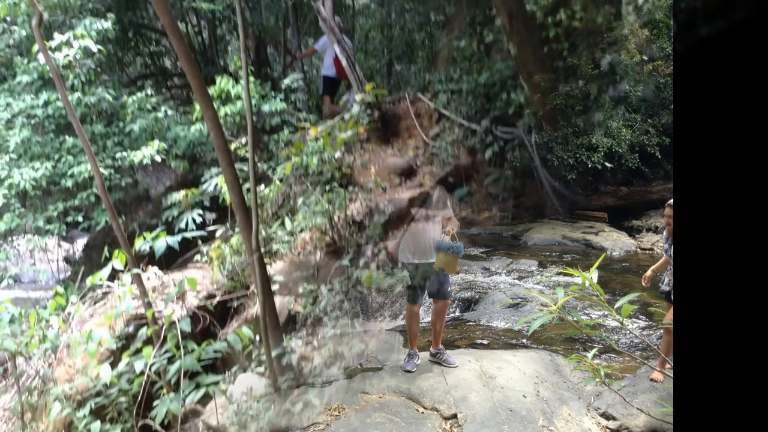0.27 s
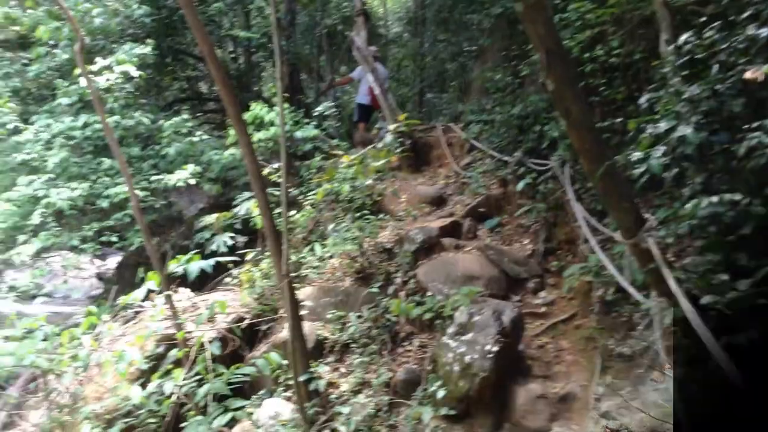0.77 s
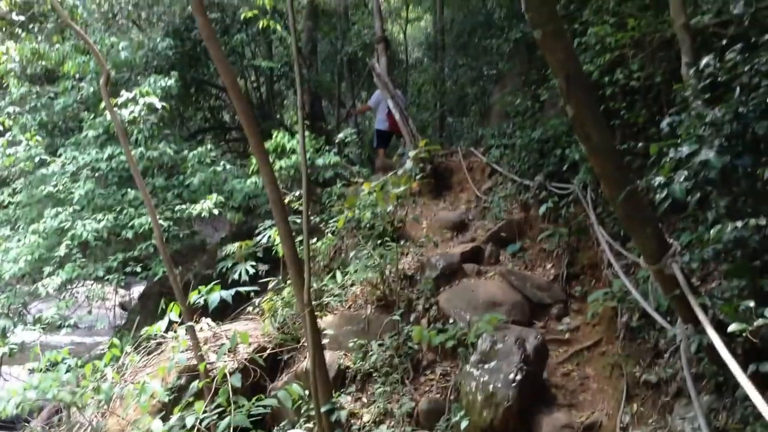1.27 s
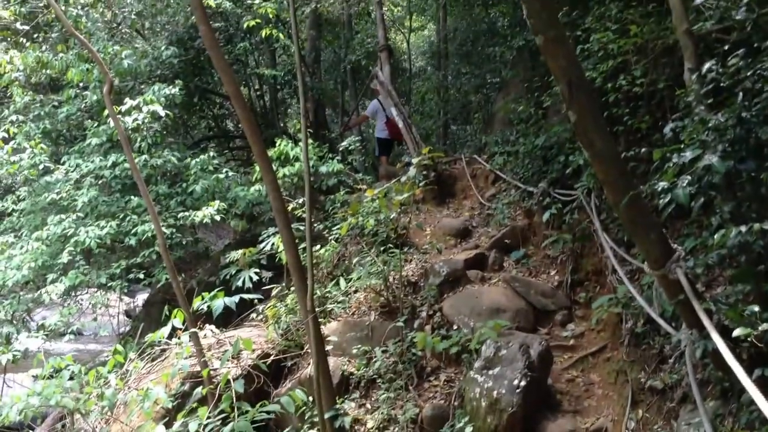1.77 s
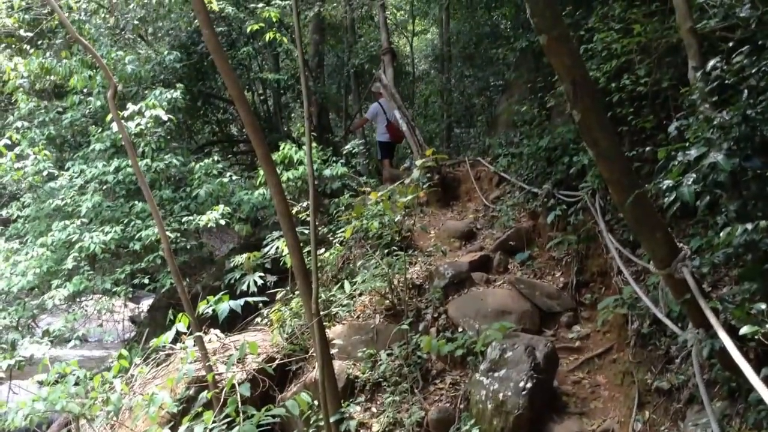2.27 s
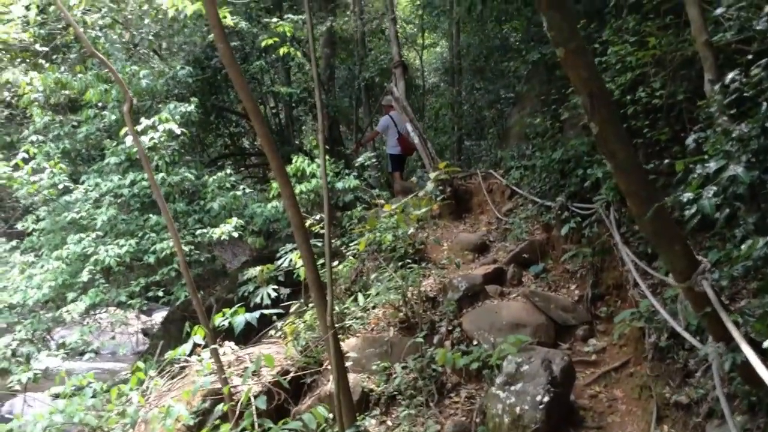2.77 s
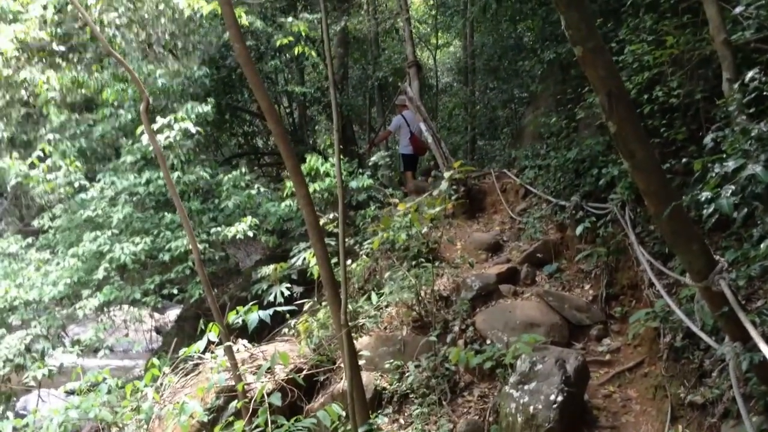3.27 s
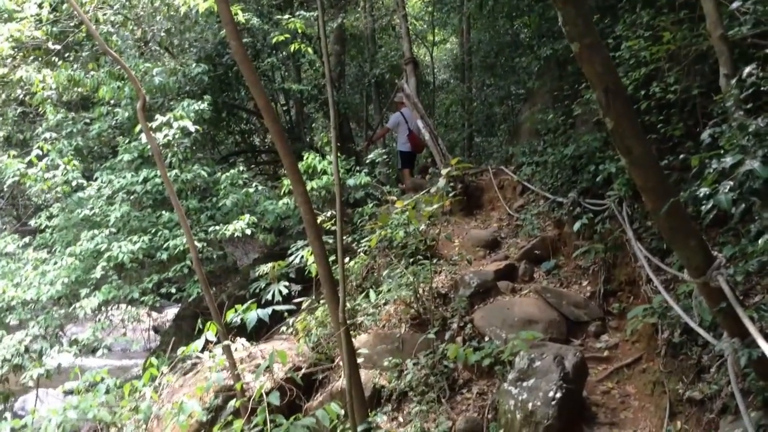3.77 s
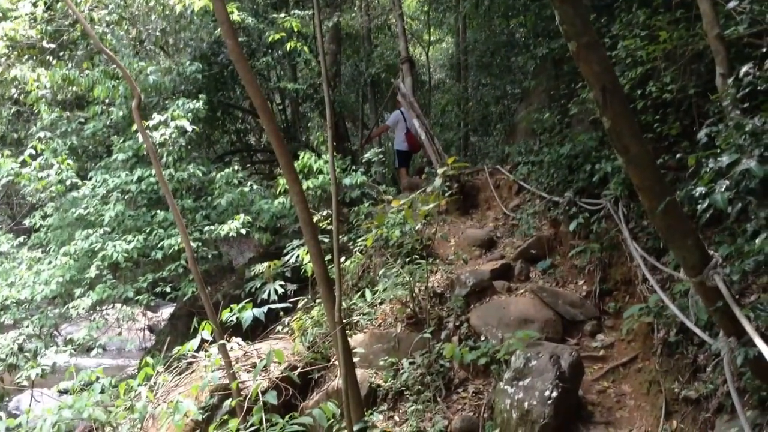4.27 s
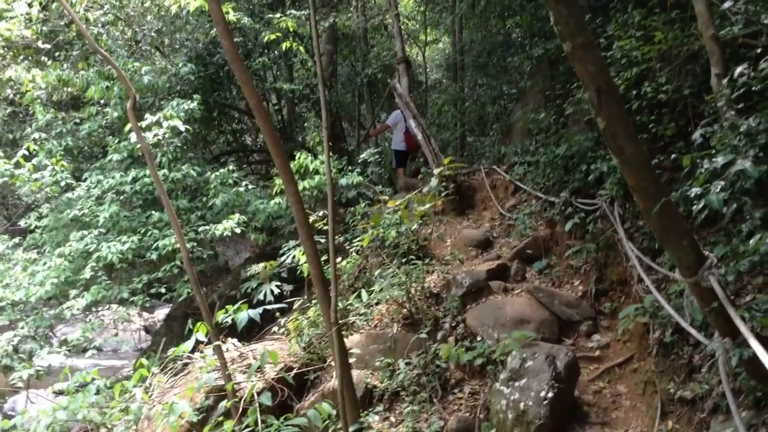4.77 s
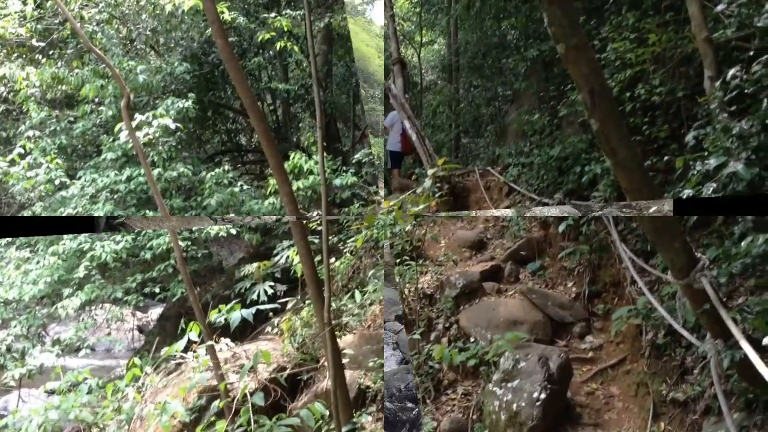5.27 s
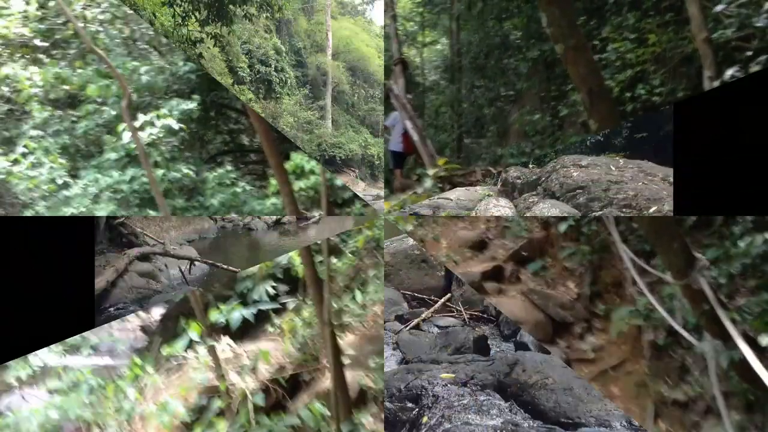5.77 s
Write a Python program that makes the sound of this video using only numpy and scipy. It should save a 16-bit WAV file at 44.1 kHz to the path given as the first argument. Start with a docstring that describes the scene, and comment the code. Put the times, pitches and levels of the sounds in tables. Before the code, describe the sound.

Silence for about 0.2 seconds, then the rush of a jungle stream cuts in at roughly half strength and swells smoothly to full level by 0.95 seconds. It is a dense, nearly constant wash of white water over rocks: a full midrange rush beneath a bright, crisp hiss of spray, with only slight flickering. Quick small gurgles, clear trickling bubbles and fine fizz are woven into it, blurred together. Very softly underneath, a plunge pool throbs at one low pitch, in irregular surges roughly twice a second. Faint distant insects add thin, fuzzy high tones that also swell about twice a second, almost buried. The level holds until about 5.0 seconds, sinks to about half, and cuts out abruptly at 5.8, leaving silence. Outdoors, no obvious echo, centred, with deep bass trimmed.

```python
"""Stream below a forest path

A jungle stream rushes over rocks: modulated noise gives the even wash and spray, and decaying
sinusoids give the bubbles of gurgling, fizzing cascades. A plunge pool booms softly and far insects
shrill in the trees, each as noise in a narrow resonance. The sound cuts in, swells, holds, sinks and
cuts out; both channels are identical."""
import sys
import numpy as np
from scipy import signal
from scipy.fft import rfft, irfft
from scipy.io import wavfile
from scipy.ndimage import uniform_filter1d

SR = 44100
rng = np.random.default_rng(int(sys.argv[2]) if len(sys.argv) > 2 else 0)


def digitize_waveform(pressure):
    """Quantize a signal to 16-bit integers and store it at the path in sys.argv[1].

    Rows of a 2-D input are taken as channels; values are limited to [-1, 1].
    """
    field = np.atleast_2d(pressure).T
    bounded = np.clip(field, -1, 1)
    quanta = np.round(bounded * 32767).astype(np.int16)
    wavfile.write(sys.argv[1], SR, quanta)


N = 265790
TIME = np.arange(N) / SR  # s

# spectrum of the rush of white water: [f/Hz, relative spectral level/dB]
RUSH_SPECTRUM = [(30, -35), (60, -31.5), (100, -23), (150, -7), (190, -1.5), (290, -1), (420, 2.5),
                 (540, 2), (640, -4.5), (740, 0.5), (1050, -3), (1280, -5), (1500, -6.5), (3200, -10.5),
                 (9000, -28.5)]
# spectrum of the hiss of spray: [f/Hz, relative spectral level/dB]
SPRAY_SPECTRUM = [(300, -26), (1200, -8.5), (2200, -1), (3200, -5.5), (4500, -0.5), (5700, -1), (7500, 0),
                  (9500, -1), (11800, -2), (13500, 1), (15300, 3.5), (16000, -10)]
# surges of the plunge pool: [crest t/s, level above the steady boom/dB]
POOL_SURGES = [(0.38, 11), (0.86, 11), (1.17, 8.5), (1.55, 10), (1.98, 12), (2.38, 7), (2.97, 9),
               (3.86, 10), (4.3, 9.5), (4.76, 8), (5.2, 12.5)]
# insect voices: [f/Hz, nominal bandwidth/Hz, group 0-2 (index into the chorus shares)]
INSECT_VOICES = [(3605, 120, 0), (3778, 45, 0), (4725, 80, 1), (4880, 60, 2), (5040, 65, 2), (6305, 170, 0)]
# steady song of each insect voice, before the swells: [level/dB]
VOICE_LEVELS = [-65.5, -62.5, -62.5, -63, -63, -65.5]
# swells common to the insects, about two a second: [crest t/s, full rise before sharing/dB]
CHORUS_SWELLS = [(0.92, 5), (1.48, 5.5), (1.88, 6.5), (2.48, 5), (3.01, 7.5), (3.58, 5), (4.24, 5),
                 (4.73, 3), (5.16, 5)]
# how strongly groups 0, 1 and 2 join a swell: [share of its rise in dB]
CHORUS_SHARES = [0.74, 0.77, 0.93]

RUSH_DB, SPRAY_DB, POOL_DB = -45, -42, -65.5  # the pool's is its steady boom
SURGE_S, CHORUS_S = 0.14, 0.18  # time from a crest until its rise in dB is down to 1/e
START_S, STOP_S = 0.2155, 5.779  # the sound cuts in and out
FADE_IN_S, FADE_OUT_S, FADE_DEPTH_DB = 0.73, 0.74, -6  # rise from the depth, and return to it
EDGE_HZ = 15305  # upper band limit


def gain_of(db):
    """Logarithmic level: 20 dB is a factor of ten in amplitude."""
    return 10 ** (np.asarray(db) / 20)


def evened(x):
    """Normalisation: division by the root mean square gives rms 1."""
    return x / np.sqrt(np.mean(x ** 2) + 1e-20)


def read(points, hz):
    """Interpolation of a spectrum, linear in level over log frequency."""
    f, value = np.transpose(points)
    return np.interp(np.log(hz + 1), np.log(f + 1), value)


def colour(x, points):
    """Linear filtering: the sound's spectrum is multiplied by the given one."""
    gain = gain_of(read(points, np.fft.rfftfreq(N, 1 / SR)))
    return irfft(rfft(x) * gain, N)


def drift(t, slow_hz, fast_hz, count=30):
    """Superposition: sinusoids of random phase between two rates wander irregularly, with rms 1."""
    rates = np.geomspace(slow_hz, fast_hz, count)[:, None]
    phases = rng.random((count, 1))  # in cycles
    return evened(np.sin(2 * np.pi * (rates * t + phases)).sum(0))


def churn(spectrum, patch_db, surge_db, flicker_db, size):
    """Modulated turbulence noise: time-frequency patches come and go; the whole surges and flickers."""
    hop, window = 128, 512  # samples
    frames, bins = N // hop + 5, window // 2 + 1
    t = np.arange(frames) * hop / SR
    real, imag, patches = rng.standard_normal((3, frames, bins))
    # smoothing over size = (frames, bins) sets the extent of a patch
    patches = uniform_filter1d(patches, size[0], axis=0)
    patches = evened(uniform_filter1d(patches, size[1], axis=1))
    flow_db = surge_db * drift(t, 0.94, 6) + flicker_db * drift(t, 6.8, 45)
    field = (real + 1j * imag) * gain_of(patch_db * patches + flow_db[:, None])
    noise = signal.istft(field.T, nperseg=window, noverlap=window - hop)[1][:N]
    return evened(colour(noise, spectrum))


def bubbles(low_hz, high_hz, per_s, cycles, rise, spread_db, count=36):
    """Damped bubble resonance: each rings, rising in pitch as it nears the surface; a few are large."""
    out = np.zeros(N)
    for hz in np.geomspace(low_hz, high_hz, count):
        decay_s = cycles / hz
        age = np.arange(int(5 * decay_s * SR)) / (decay_s * SR)  # in decay times
        envelope = np.exp(-age) * (1 - np.exp(-6 * age))
        ring = envelope * np.sin(2 * np.pi * cycles * age * (1 + rise * age))
        births = rng.random(N) < per_s / count / SR
        sizes = gain_of(spread_db * np.minimum(rng.exponential(1, N), 3))
        out += signal.oaconvolve(births * sizes, ring)[:N]
    return evened(out)


def stream():
    """Incoherent superposition of white water, gurgling cascades, trickles, spray and fine fizz."""
    rush = gain_of(RUSH_DB) * churn(RUSH_SPECTRUM, patch_db=0.65, surge_db=0.26, flicker_db=0.2,
                                    size=(20, 4))
    spray = gain_of(SPRAY_DB) * churn(SPRAY_SPECTRUM, patch_db=0.66, surge_db=0.03, flicker_db=0.4,
                                      size=(12, 10))
    gurgle = gain_of(-59) * bubbles(360, 1200, per_s=350, cycles=9.9, rise=0.014, spread_db=1.5)
    trickle = gain_of(-58.5) * bubbles(999.7, 3208, per_s=330, cycles=19.0, rise=0.008, spread_db=6.5)
    fizz = gain_of(-61.5) * bubbles(2800, 12830, per_s=2000, cycles=6.5, rise=0.01, spread_db=2.0)
    return rush + gurgle + trickle + spray + fizz


def crests(rows, length_s):
    """Gaussian level envelope: each swell rises smoothly to a crest in dB and sinks back."""
    return sum(db * np.exp(-((TIME - s) / length_s) ** 2) for s, db in rows)


def narrow(hz, width_hz):
    """Resonant filtering: noise through one steep resonance is a fuzzy tone, of rms 1."""
    detune = (np.fft.rfftfreq(N, 1 / SR) - hz) / width_hz
    resonance = 1 / (1 + 2 * detune ** 2)
    return evened(irfft(rfft(rng.standard_normal(N)) * resonance, N))


def pool():
    """Collective resonance: an air cloud driven under the fall throbs at one low pitch with each surge."""
    level_db = POOL_DB + crests(POOL_SURGES, SURGE_S)
    return gain_of(level_db) * narrow(215, 18)


def insects(waver_db=1.0):
    """Scattering: the forest blurs each far singer to a narrow band; all swell, and each wavers alone."""
    out = np.zeros(N)
    coarse_t = TIME[::200]
    chorus_db = crests(CHORUS_SWELLS, CHORUS_S)
    for (hz, width_hz, group), voice_db in zip(INSECT_VOICES, VOICE_LEVELS):
        waver = np.interp(TIME, coarse_t, drift(coarse_t, 3.1, 20))
        effort_db = CHORUS_SHARES[group] * chorus_db + waver_db * waver
        out += gain_of(voice_db + effort_db) * narrow(hz, width_hz)
    return out


def fade():
    """Amplitude envelope: the gain rises linearly after the start, holds, and sinks before the stop."""
    rising, sinking = (TIME - START_S) / FADE_IN_S, (STOP_S - TIME) / FADE_OUT_S
    opening = np.clip(np.minimum(rising, sinking), 0, 1)
    return gain_of(FADE_DEPTH_DB) * (1 - opening) + opening


def scene():
    """Linear superposition: water and insects add under one fade, the same in both ears."""
    forest = fade() * (stream() + pool() + insects())
    return np.array([forest, forest])


def record(dry, low_cut_hz=85):
    """Band limitation: the microphone sheds deep bass, the sound cuts in and out, then treble is cut."""
    high_pass = signal.butter(2, low_cut_hz, "highpass", fs=SR, output="sos")
    lean = signal.sosfilt(high_pass, dry)
    running = (TIME >= START_S) & (TIME < STOP_S)
    low_pass = signal.firwin(2047, EDGE_HZ, window=("kaiser", 9), fs=SR)
    return signal.oaconvolve(lean * running, low_pass[None], "same")


dry = scene()
out = record(dry)
digitize_waveform(out)
```